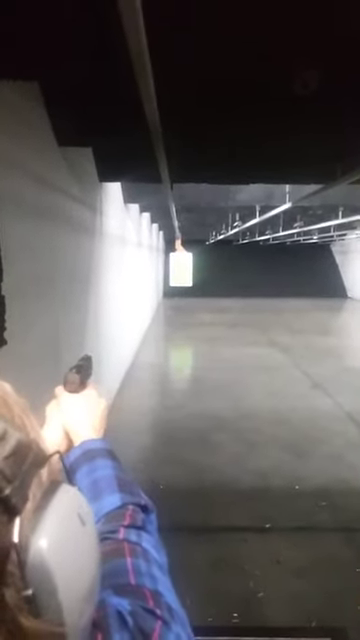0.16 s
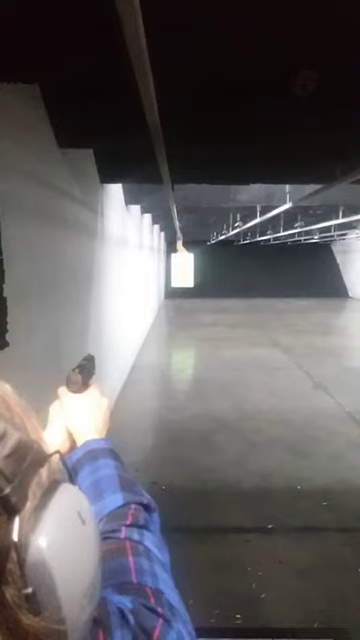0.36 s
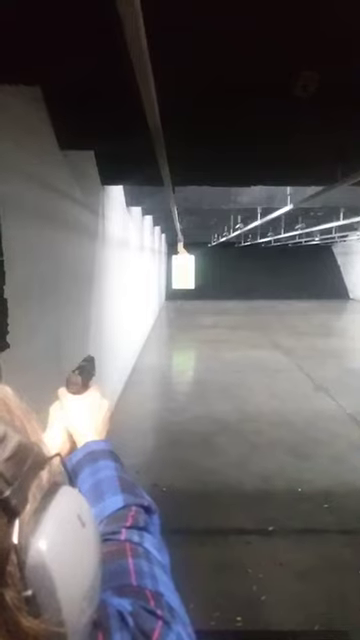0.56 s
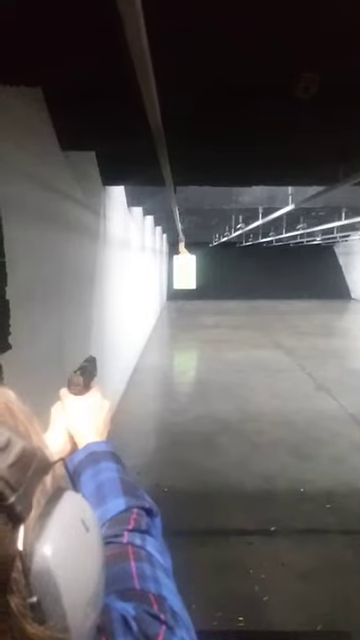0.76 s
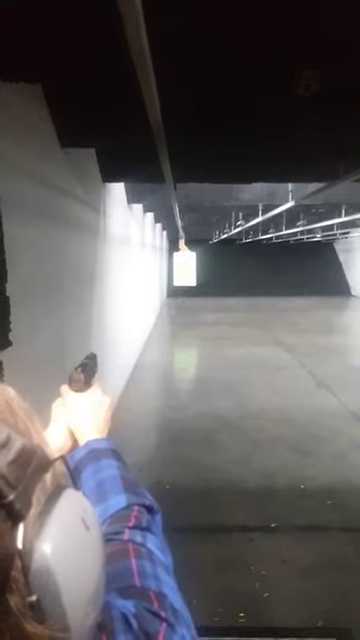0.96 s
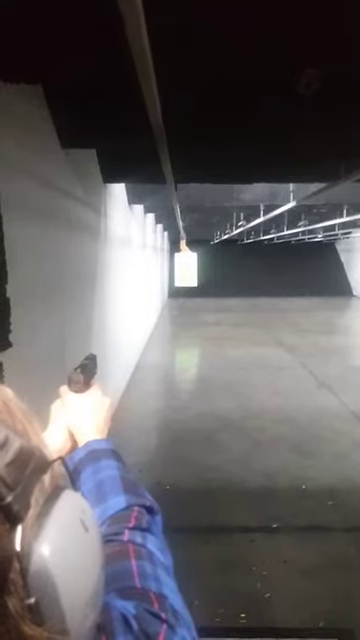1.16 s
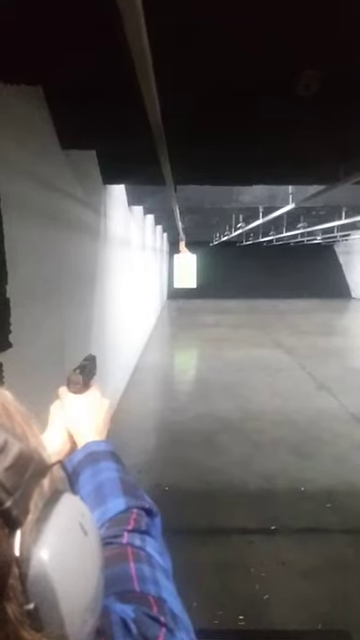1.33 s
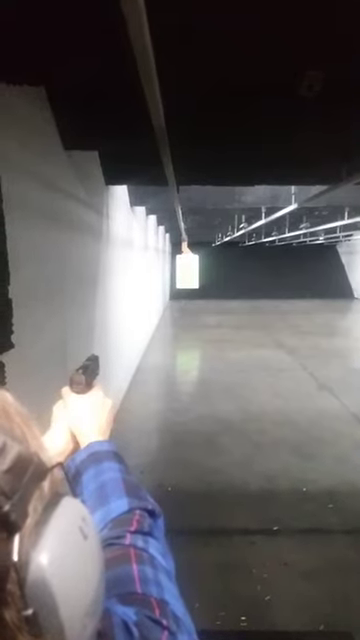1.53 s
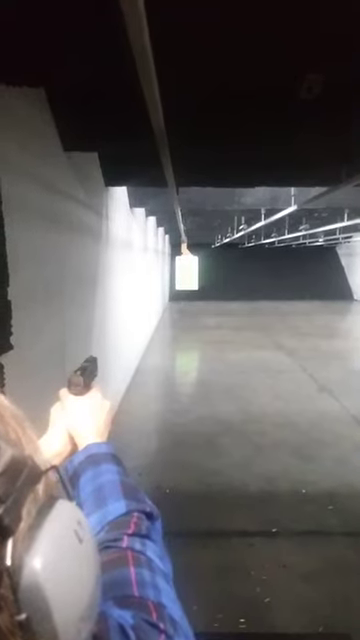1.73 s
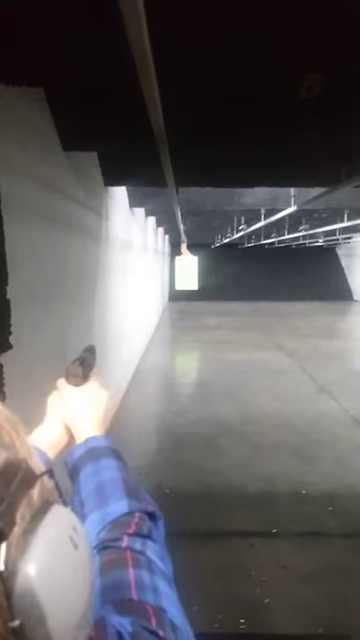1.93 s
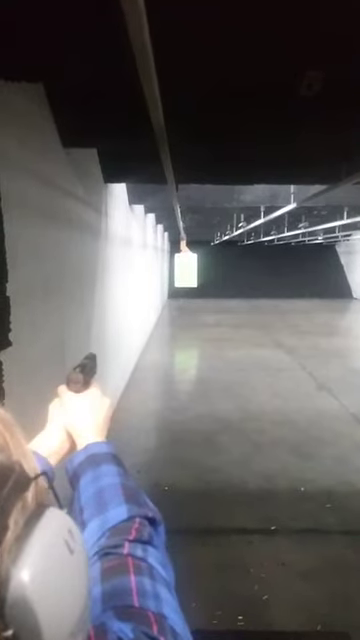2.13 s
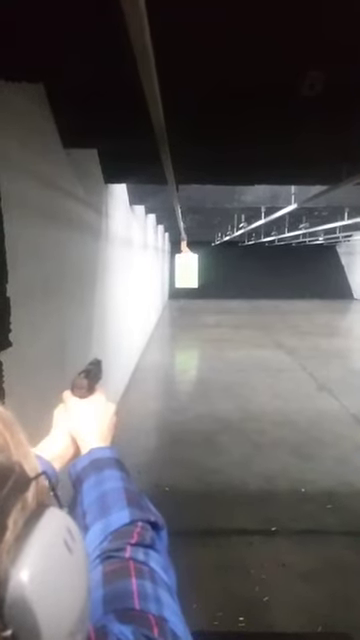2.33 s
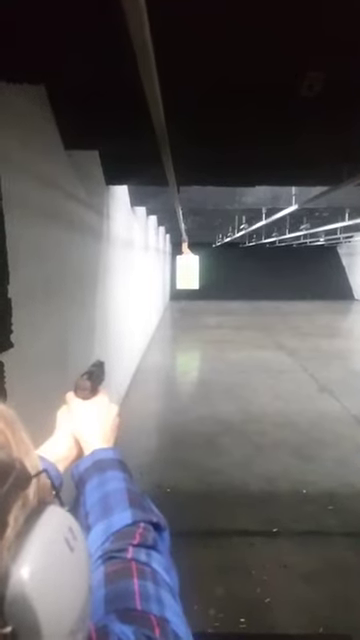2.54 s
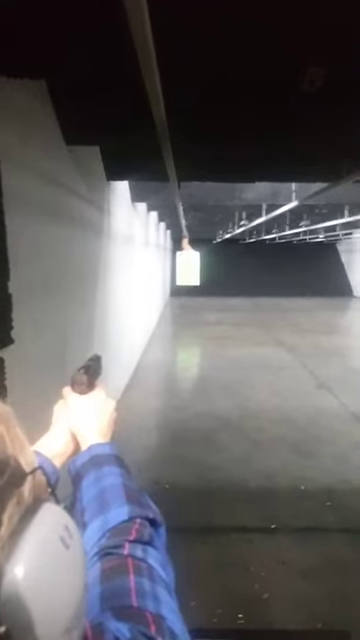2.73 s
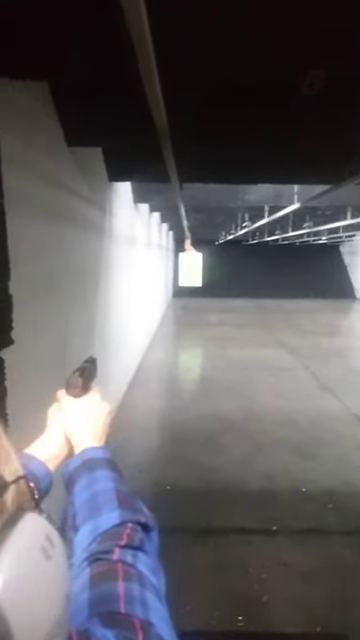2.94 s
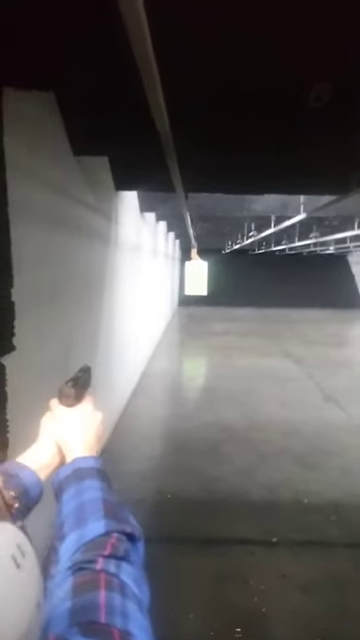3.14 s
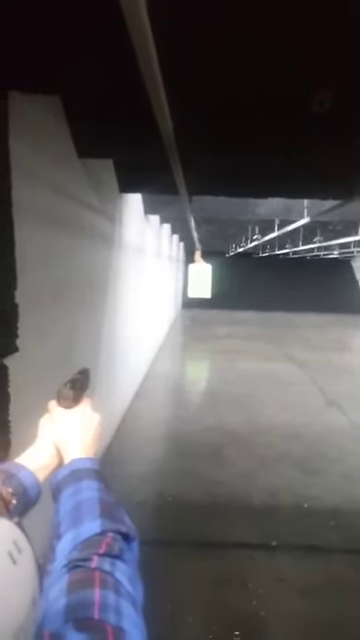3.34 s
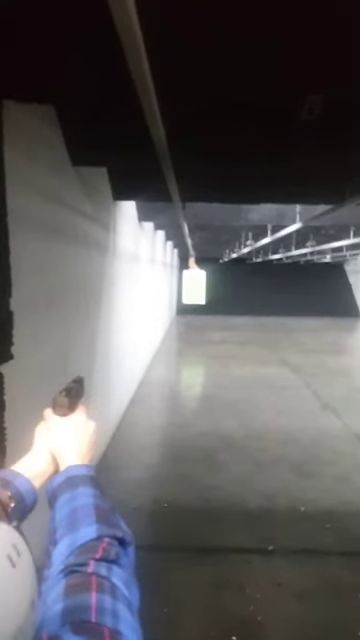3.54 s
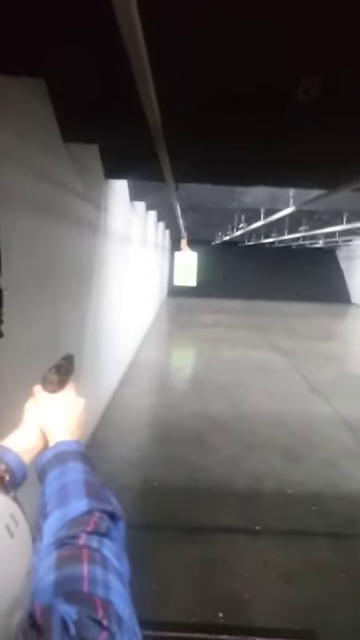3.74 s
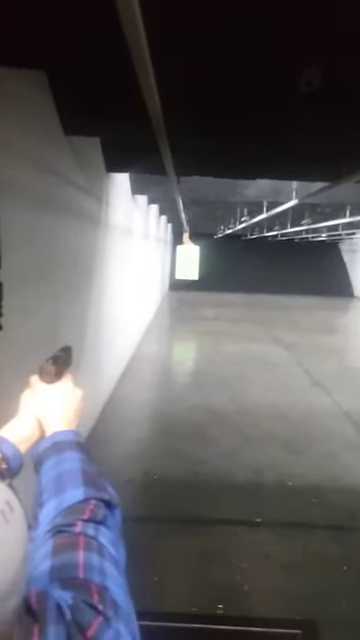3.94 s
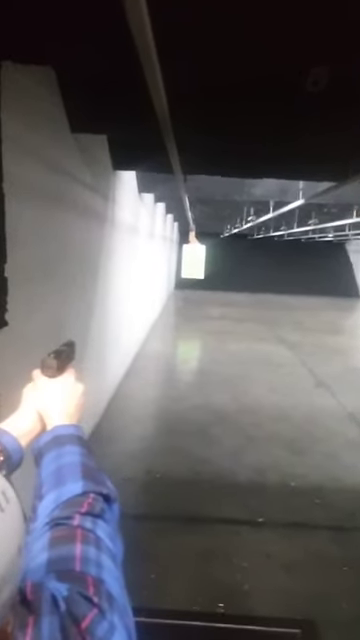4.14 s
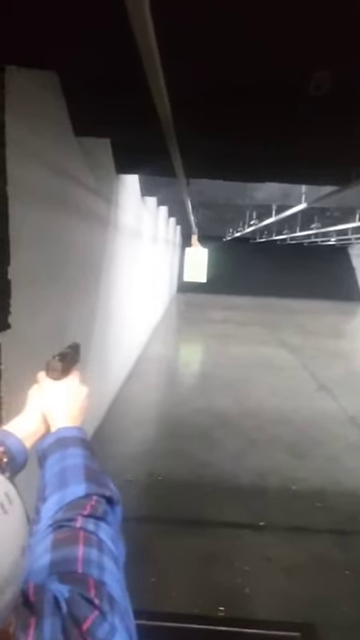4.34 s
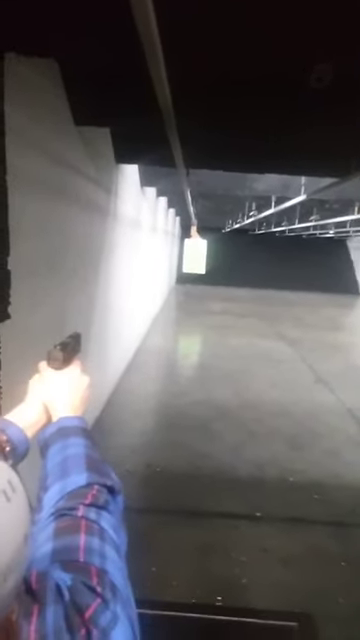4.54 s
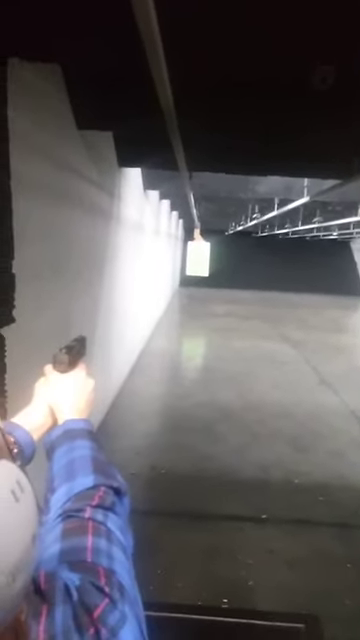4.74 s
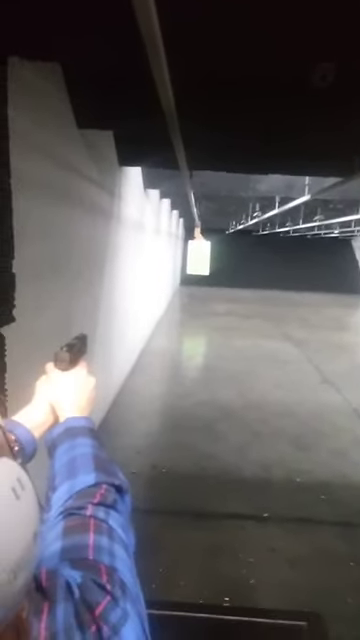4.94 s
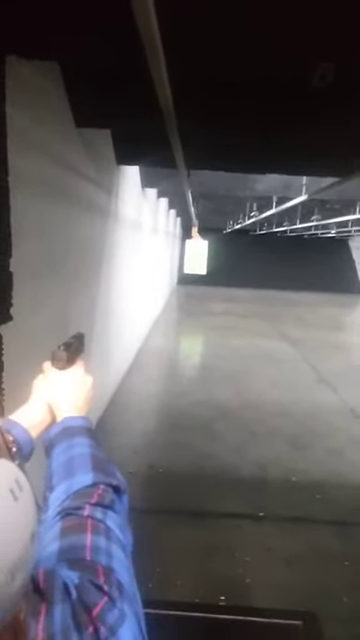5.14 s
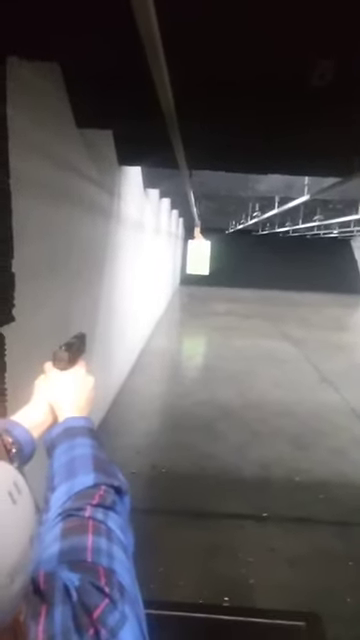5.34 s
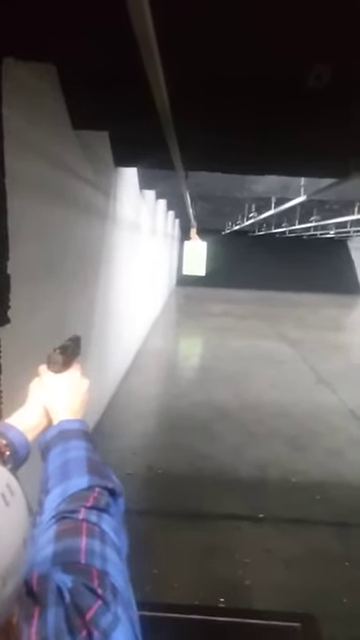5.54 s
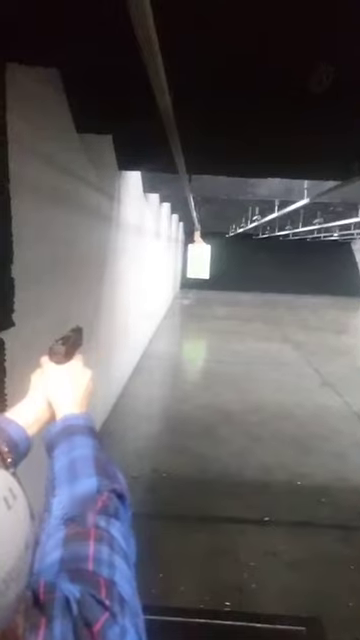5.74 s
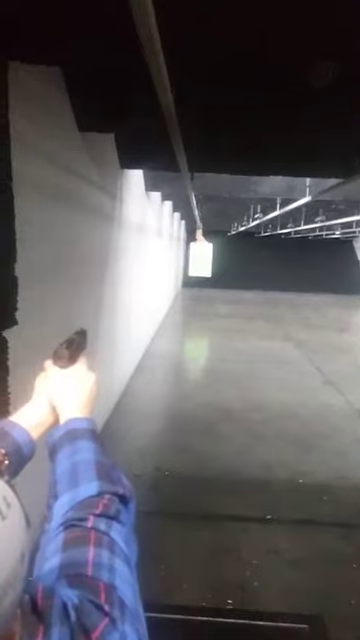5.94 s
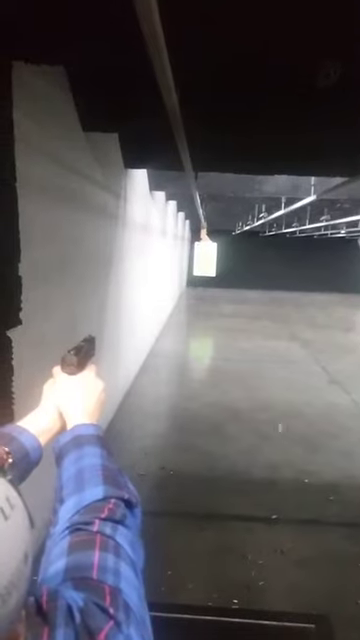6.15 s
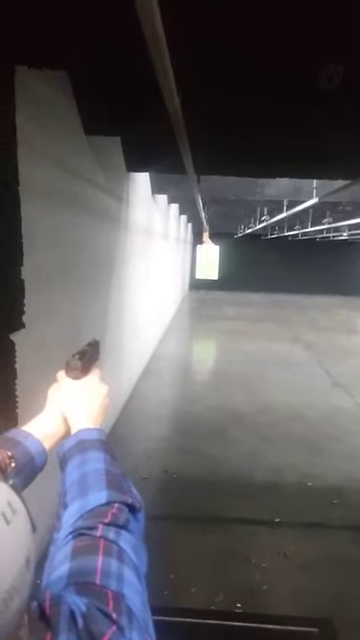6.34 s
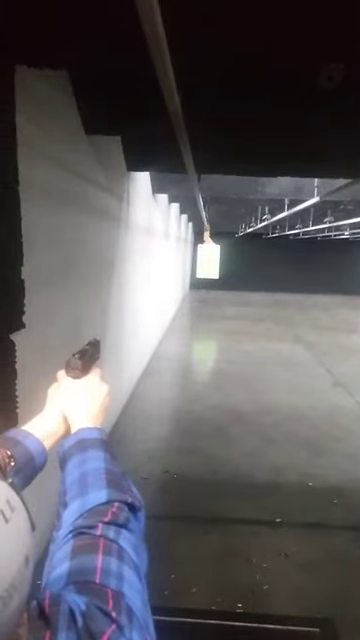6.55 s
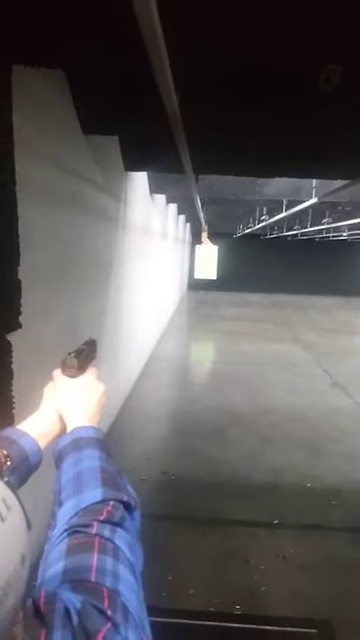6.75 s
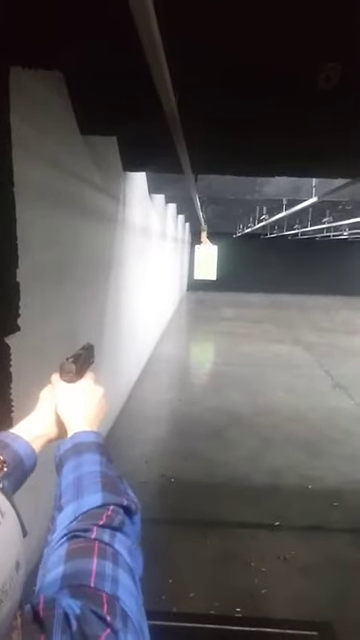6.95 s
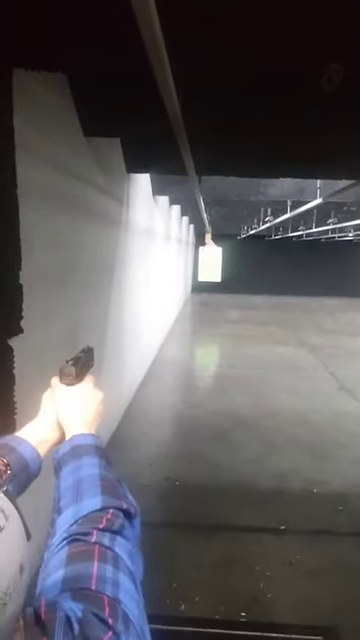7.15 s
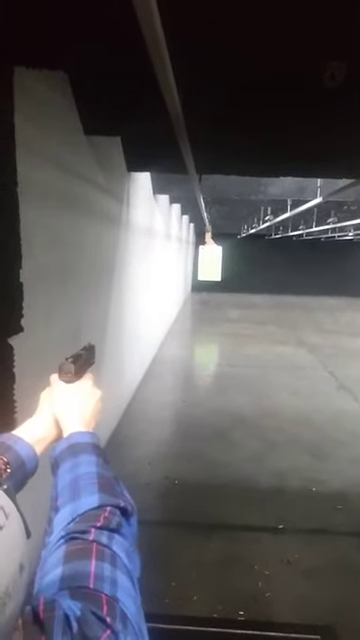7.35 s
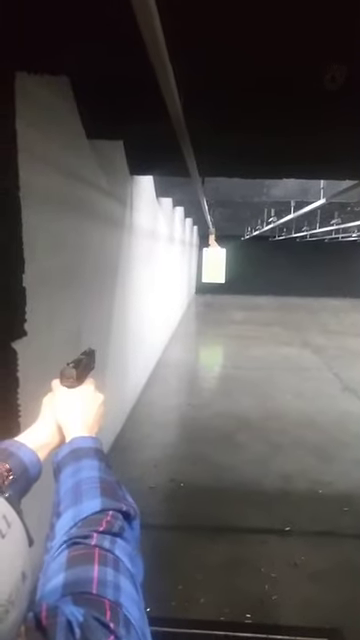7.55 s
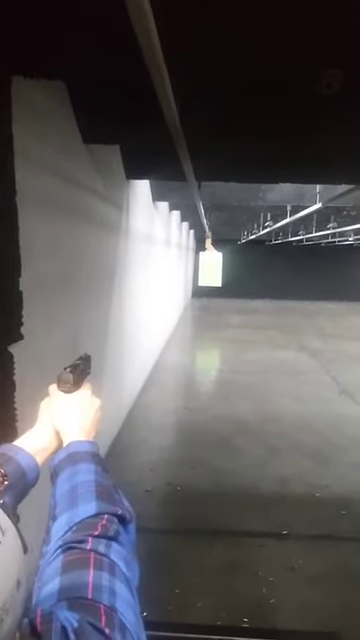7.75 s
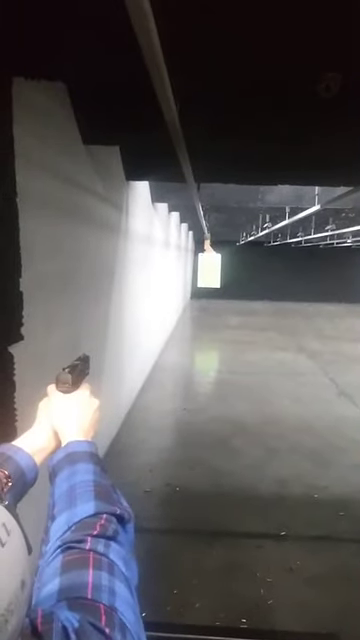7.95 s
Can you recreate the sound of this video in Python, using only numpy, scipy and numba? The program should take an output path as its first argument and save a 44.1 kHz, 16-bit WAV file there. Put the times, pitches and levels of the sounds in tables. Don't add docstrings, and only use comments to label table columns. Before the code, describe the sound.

Over steady ventilation hum, a trigger clicks, a handgun blast overloads the microphone, the hall roars, a casing bounces; then it all repeats.

```python
import sys
import numpy as np
from scipy import signal
from scipy.fft import rfft, irfft, next_fast_len
from scipy.io import wavfile
from scipy.ndimage import uniform_filter1d, minimum_filter1d
from numba import njit

SR = 44100
rng = np.random.default_rng(int(sys.argv[2]) if len(sys.argv) > 2 else 0)


def dump_mix(stems):
    frames = np.atleast_2d(stems).T
    limited = np.clip(frames, -1, 1)
    pcm = np.round(limited * 32767).astype(np.int16)
    wavfile.write(sys.argv[1], SR, pcm)


def voltage_ratio(level):
    return 10 ** (np.asarray(level, float) / 20)


N = 356769
T = np.arange(N) / SR

# (frequency [Hz], density [dB per Hz])
AIR_SPECTRUM = [(24, -53), (40, -80), (118, -15), (156, -13.5), (191, 0), (271, -3), (396, 0), (427, -2),
                (461, -0.5), (639, 0), (3290, -14.5), (4020, -16.5), (5050, -15.5), (15300, -45.5),
                (16500, -16.5)]
# (frequency [Hz], level [dB])
MOTOR_WHINE = [(3771, -76), (3849, -70), (3909, -69.5), (3969, -67.5), (4008, -73), (4030, -68.5),
               (4090, -64), (4150, -69.5), (4188, -72), (4287, -76), (4408, -71.5), (14002, -87)]
# (time [s], level [dB])
TRIGGER_PULLS = [
    (1.8438, -31.5),
    (5.6933, -34),
]
# (offset [s], level [dB], centre [Hz], width [Hz], T60 [s])
TRIGGER_PARTS = [
    (-.007, -13, 6800, 3500, 0.019),
    (0, -4, 4800, 3000, 0.022),
    (.002, -3, 2300, 1900, .05),
]
# (time [s], level [dB], centre [Hz], width [Hz], T60 [s])
METAL_TICKS = [
    (.5556, -31, 10000, 9000, .009),
    (.5558, -34, 5800, 1500, .009),
    (2.165, -24, 12540, 300, .15),
    (5.965, -13, 11250, 300, .08),
    (4.11, -66, 11100, 120, .5),
]
# (time [s], tick level [dB], high ring level [dB], knock level [dB])
CASE_BOUNCES = [(2.787, -15, -22, -15), (3.3473, -31.5, -24.5, -30), (3.706, -36, -31.5, -31),
                (3.911, -37, -36, -28), (4.0034, -42, -44, -34.5), (4.1086, -66, -45, -43),
                (4.182, -58, -48, -49), (4.2284, -68, -42, -50), (6.525, -22, -19.5, -13.5),
                (6.8957, -32, -22, -19), (7.28, -67, -30.5, -30), (7.2958, -61, -40, -54),
                (7.339, -57, -53, -53), (7.447, -48, -29, -42), (7.67, -34.5, -38, -27),
                (7.837, -34.5, -56, -30), (7.9584, -58, -38, -52), (7.9963, -61, -33, -51),
                (8.0394, -62, -41, -53)]
CASE_RING_HZ = [
    12540,
    12750,
]
# (frequency [Hz], density [dB per Hz])
ROAR_SPECTRUM = [(47, -78), (90, -28.5), (280, -11.5), (420, 1), (600, 8), (850, 6), (1300, 1),
                 (1800, -5.5), (2690, -4.5), (3510, -9.5), (4200, -6.5), (6000, -7.5), (10500, -15),
                 (15500, -25)]
# (frequency [Hz], T60 [s])
HALL_REVERBERATION = [(60, 1.05), (250, 1.83), (420, 1.41), (620, 1.43), (1000, 1.874), (2000, 1.645),
                      (4000, 1.57), (7000, 1.09), (10000, 0.68), (12500, 0.74), (15500, 0.5)]
# (frequency [Hz], width [Hz], level [dB], T60 [s])
BAFFLE_MODES = [(597, 120, -25.5, 3.2), (821.4, 67, -26.5, 3.23), (1037, 99, -33.5, 3.88),
                (1660, 880, -48.5, 4.3)]
# (shot time [s], twitch on the rail [s], seeping [s], flip to other rail [s], free [s])
SHOTS = [
    (1.8950, 1.9422, 1.984, 2.0328, 2.082),
    (5.7405, 5.7817, 5.8275, 5.8832, 5.9270),
]
# (start [s], end [s], level [dB])
RAIL_CHATTER = [
    (1.9032, 1.9152, -3),
    (5.7505, 5.7550, -6),
]
# (time [s], level [dB])
LONE_SPIKES = [(2.049, -15.5), (2.0526, -8), (2.062, -18), (2.0653, -4), (2.0704, -22), (2.0717, -9.5),
               (2.0765, -7), (2.0776, -8), (5.9110, -13), (5.9112, -15), (5.9127, -15), (5.915, -15),
               (5.9173, -2), (5.9190, -14), (5.9240, -24)]

AIR_DB, BLAST_DB, HISS_DB = -45.5, 14, -69
BACK_WALL_S = .0765
KNOCK_HZ, HZ_PER_TICK_DB, LOW_RING_DB = 6690, 24.5, -22.5
SLAM_S, PINNED_S = .0047, .007
PINNED_DB, DEEP_DB, SINK_S = -36, -80, .013
SEEP_DB, SWELL_S = -46.5, .011
FLIPPED_DB, DROP_S, RECOVER_S = -74, .001, .004
SLAM_DB, TWITCH_DB, SEEP_STEP_DB, FLIP_DB = -8, -32, -37, -5
CHATTER_GAP_S, CHATTER_JITTER_S, CHATTER_SPREAD_DB = .0018, .00035, 2.2
ECHO_S, ECHO_DB = .0004, -6
SPIKE_S, WIDER_PER_DB = .000036, .03
LOW_CUT_HZ, TOP_HZ = 409, 15650


def band(hz, width, size=N):
    r = np.exp(-np.pi * width / SR)
    stage = [1, 0, -1, 1, -2 * r * np.cos(2 * np.pi * hz / SR), r * r]
    y = signal.sosfilt([stage, stage], rng.standard_normal(size))
    return y / y.std()


def fade(t, t60, rise):
    t = np.maximum(t, 0)
    return (1 - np.exp(-t / rise)) * np.exp(-np.log(1000) * t / t60)


def bands(spectrum):
    size = next_fast_len(N)
    f = np.maximum(np.arange(size // 2 + 1) * SR / size, 1)
    hz, db = np.transpose(spectrum)
    source = rfft(rng.standard_normal(size)) * voltage_ratio(np.interp(np.log(f), np.log(hz), db))
    source /= irfft(source).std()
    for k in np.arange(16, 43):
        weight = np.maximum(1 - np.abs(3 * np.log2(f) - k), 0)
        yield 2 ** (k / 3), irfft(source * weight)[:N]


def walk(rate):
    k = int(SR / rate)
    held = np.repeat(rng.standard_normal(N // k + 1), k)
    return 1.76 * uniform_filter1d(held, k)[:N]


def ventilation():
    swell = walk(0.27)
    air = sum(noise * voltage_ratio(.5 * swell + 0.64 * walk(9)) for f, noise in bands(AIR_SPECTRUM))
    whine = np.zeros(N)
    for hz, db in MOTOR_WHINE:
        whine += voltage_ratio(db + 3 + 1.5 * walk(5)) * np.sin(2 * np.pi * (hz * T + rng.random()))
    humps = voltage_ratio(-60.0) * band(4080, 800) + voltage_ratio(-58.0) * band(1350, 820)
    return voltage_ratio(AIR_DB - 1.0) * air + whine + humps


def action():
    pulls = []
    for s, db in TRIGGER_PULLS:
        for lag, part_db, *ring in TRIGGER_PARTS:
            pulls.append((s + lag, db + part_db, *ring))
    out = np.zeros(N)
    for s, db, hz, width, t60 in pulls + METAL_TICKS:
        out += voltage_ratio(db) * band(hz, width) * fade(T - s, t60, .0004)
    return out


def cases():
    out, size = np.zeros(N + SR), SR // 2
    t = T[:size]
    for s, tick_db, ring_db, knock_db in CASE_BOUNCES:
        hz = CASE_RING_HZ[int(s > SHOTS[1][0])]
        tick = band(7000, 16000, size=size)
        tick *= fade(t, 0.0083, 0.00079) + voltage_ratio(-16.0) * fade(t, 0.093, .003)
        ring = band(hz, 130, size=size) + 0.42 * np.sin(2 * np.pi * hz * t)
        ring *= fade(t, .2, 0.0035) + voltage_ratio(-22.0) * fade(t, 0.65, 0.0015)
        knock = band(KNOCK_HZ + HZ_PER_TICK_DB * tick_db, 1500, size=size) * fade(t, 0.049, 0.0011)
        knock += voltage_ratio(LOW_RING_DB) * band(5900, 990, size=size) * fade(t, 0.88, 0.0058)
        i = int((s - .002) * SR)
        out[i:i + size] += voltage_ratio(tick_db + 5.5) * tick + voltage_ratio(ring_db - 5) * ring + voltage_ratio(knock_db) * knock
        i += int(BACK_WALL_S * SR)
        echo = band(8000, 6000, size=size) * fade(t, .012, .0005)
        out[i:i + size] += voltage_ratio(tick_db - 18) * echo
    return out[:N]


def blasts():
    shots = [row[0] for row in SHOTS]
    hz, t60 = np.transpose(HALL_REVERBERATION)
    out = np.zeros(N)
    for f, noise in bands(ROAR_SPECTRUM):
        decay = np.interp(np.log(f), np.log(hz), t60)
        rise = 22.0 / f + 0.012
        envelope = sum(voltage_ratio(BLAST_DB) * fade(T - s - .002, decay, rise) for s in shots)
        out += noise * envelope * voltage_ratio(0.28 * walk(14))
    for f, width, db, decay in BAFFLE_MODES:
        envelope = sum(voltage_ratio(BLAST_DB) * fade(T - s, decay, .05) for s in shots)
        out += band(f, width) * voltage_ratio(db) * envelope
    crack, snap = band(4400, 3500), band(7500, 9000)
    for s in shots:
        out += voltage_ratio(2) * crack * fade(T - s, 0.045, 0.0025) ** 2
        out += voltage_ratio(-3.0) * snap * fade(T - s - .002, 0.025, 0.0011)
    return out


def scene():
    return np.tile(ventilation() + action() + cases() + blasts(), (2, 1))


@njit
def gain_control(x, top, slope, attack, release):
    gain, e = np.ones(len(x)), 0.
    for i in range(len(x)):
        e += (abs(x[i]) - e) * (attack if abs(x[i]) > e else release)
        if e > top:
            gain[i] = (top / e) ** slope
    return gain


def ease(t, tau):
    return 1 - np.exp(-np.maximum(t, 0) / tau)


def leak_db(pinned, seep, flip, free):
    on_first_rail = (T >= pinned) * (T < seep)
    first = on_first_rail * (PINNED_DB + (DEEP_DB - PINNED_DB) * ease(T - pinned, SINK_S))
    seeping = (T >= seep) * SEEP_DB * ease(flip - T, SWELL_S)
    flipped = FLIPPED_DB * ease(T - flip, DROP_S) * ease(free - T, RECOVER_S)
    return first + seeping + flipped


def escapes():
    rows = [(s, db, -1) for s, db in LONE_SPIKES]
    for start, end, height_db in RAIL_CHATTER:
        for s in np.arange(start, end, CHATTER_GAP_S):
            late, loud, side = rng.standard_normal(3)
            s += CHATTER_JITTER_S * late
            db = height_db + CHATTER_SPREAD_DB * loud
            rows += [(s, db, 1), (s + ECHO_S * side, db + ECHO_DB, 1)]
    out = np.zeros(N)
    for s, db, direction in rows:
        i = np.arange(int(s * SR) - 80, int(s * SR) + 80)
        width = SPIKE_S * max(1 + WIDER_PER_DB * db, .6)
        out[i] += direction * 1.7 * voltage_ratio(db) * np.exp(-.5 * ((i / SR - s) / width) ** 2)
    return out


def overload(x, rail):
    pass_db, bias, strain, steps = np.zeros(N), np.zeros(N), np.zeros(N), []
    for shot, twitch, seep, flip, free in SHOTS:
        pass_db += leak_db(shot + PINNED_S, seep, flip, free)
        drift = 1.15 * rail * np.exp(-(T - free) / 0.039)
        bias += (T > free - .0015) * np.minimum(drift, 2 * rail)
        strain += (T > shot) * np.minimum(np.exp(-(T - free - .03) / 0.029), 1)
        steps += [(shot + SLAM_S, SLAM_DB), (twitch, TWITCH_DB), (seep, SEEP_STEP_DB), (flip, FLIP_DB)]
    dull = signal.sosfilt(signal.butter(2, 1500, fs=SR, output="sos"), x)
    x = voltage_ratio(pass_db) * (dull + (x - dull) * voltage_ratio(-.08 * pass_db))
    clipped = np.clip(x + bias, -rail, rail) - np.clip(bias, -rail, rail)
    hiss = voltage_ratio(-88) * rng.standard_normal(N) * (pass_db < 0)
    low_cut = signal.butter(4, LOW_CUT_HZ, "high", fs=SR, output="sos")
    strained = signal.sosfilt(low_cut, clipped + escapes() + hiss)
    thumps = np.zeros(N)
    for s, db in steps:
        thumps += voltage_ratio(db) * fade(T - s, .011, .00008) * np.cos(2 * np.pi * 520 * (T - s))
    return strain * strained + (1 - strain) * x - thumps


def limit(x, top, ms):
    k = int(ms * SR / 1000)
    gain = minimum_filter1d(np.minimum(top / (np.abs(x) + 1e-9), 1), 3 * k)
    for _ in range(3):
        gain = uniform_filter1d(gain, k)
    return x * gain


def low_pass(x):
    return signal.sosfilt(signal.butter(12, 17160, fs=SR, output="sos"), x)


def record(dry):
    x = dry[0] + voltage_ratio(HISS_DB) * rng.standard_normal(N)
    x = signal.sosfilt(signal.ellip(8, .3, 60, TOP_HZ, fs=SR, output="sos"), x)
    gain = gain_control(x, 0.33, 0.73, 0.0094, 0.0012)
    x *= uniform_filter1d(uniform_filter1d(gain, size=60), size=60)
    x = limit(overload(x, 1.0), 0.69, 0.12)
    x = signal.sosfilt(signal.ellip(6, .2, 30, 16100, fs=SR, output="sos"), x)
    return low_pass(np.tile(x, (2, 1)))


dry = scene()
out = record(dry)
dump_mix(out)
```